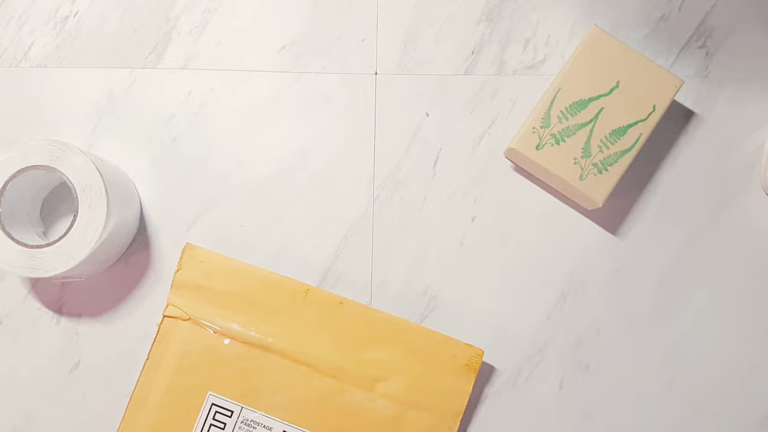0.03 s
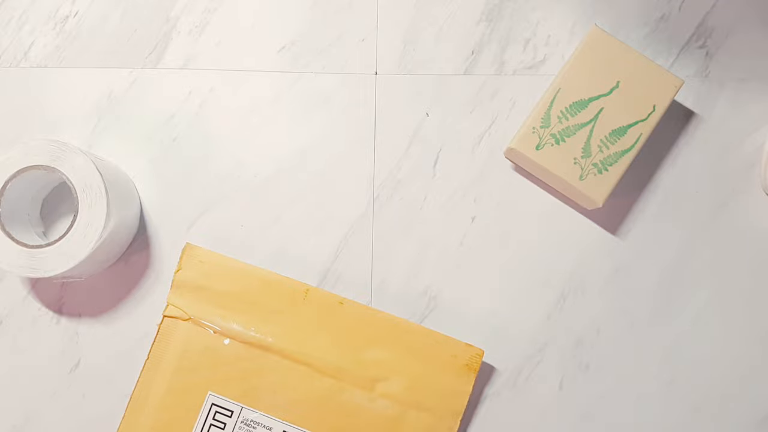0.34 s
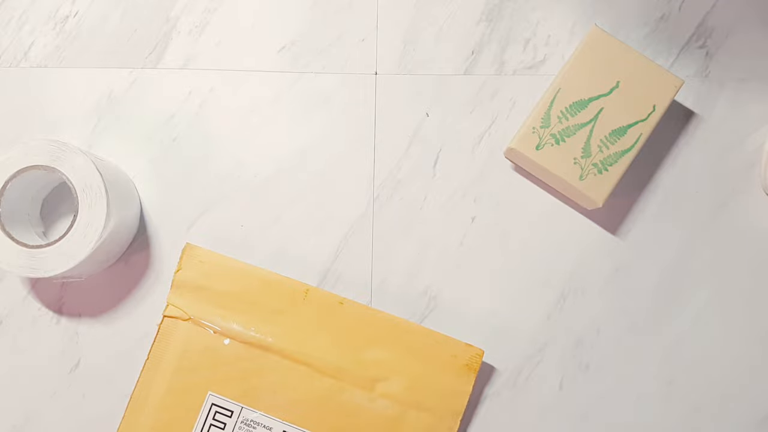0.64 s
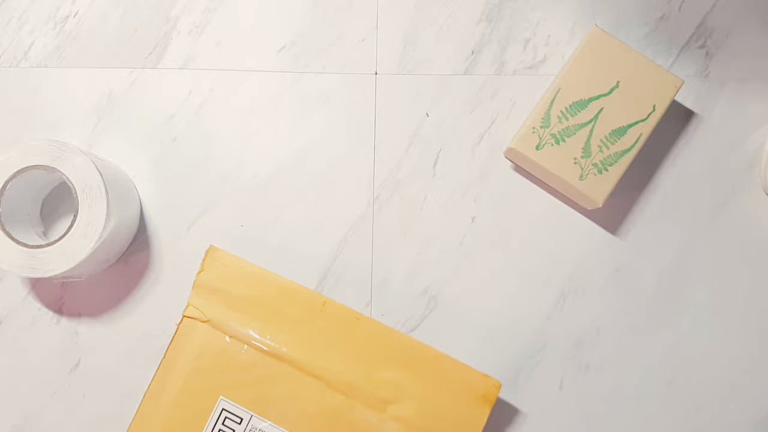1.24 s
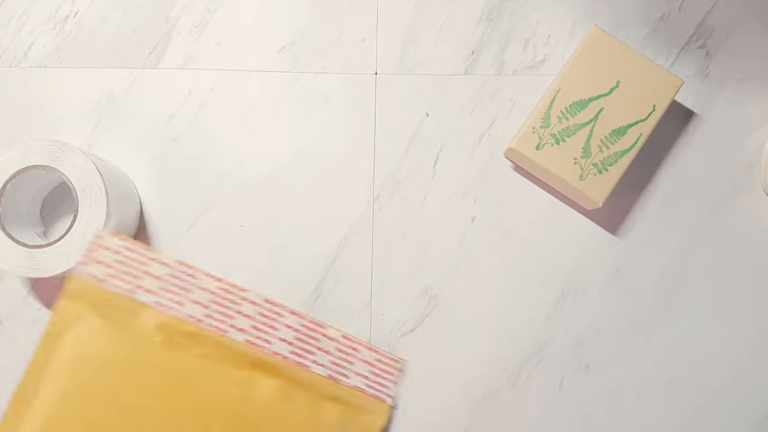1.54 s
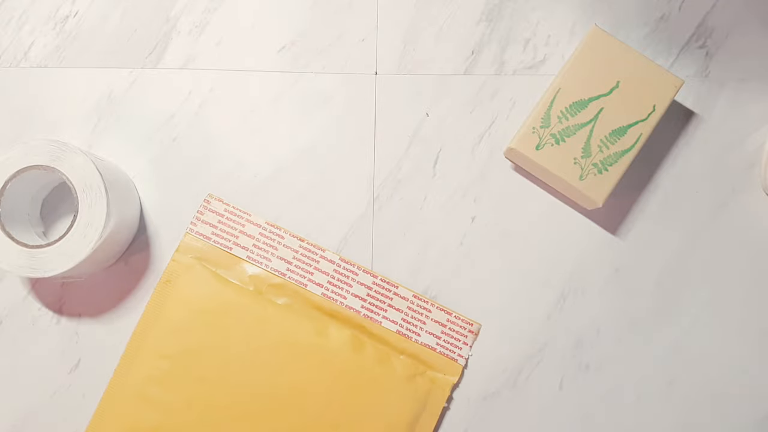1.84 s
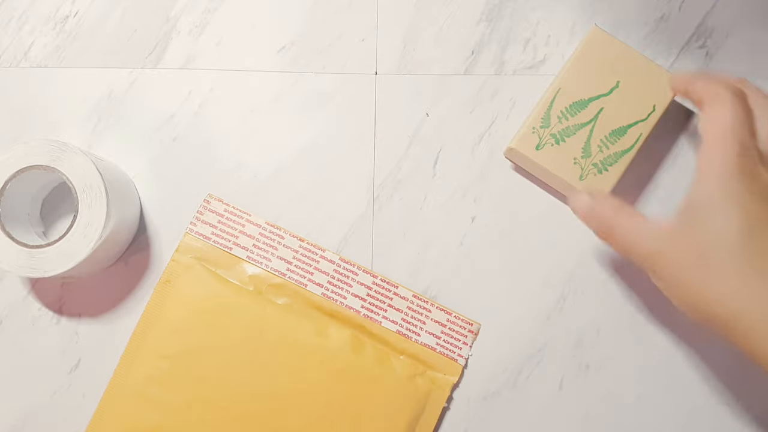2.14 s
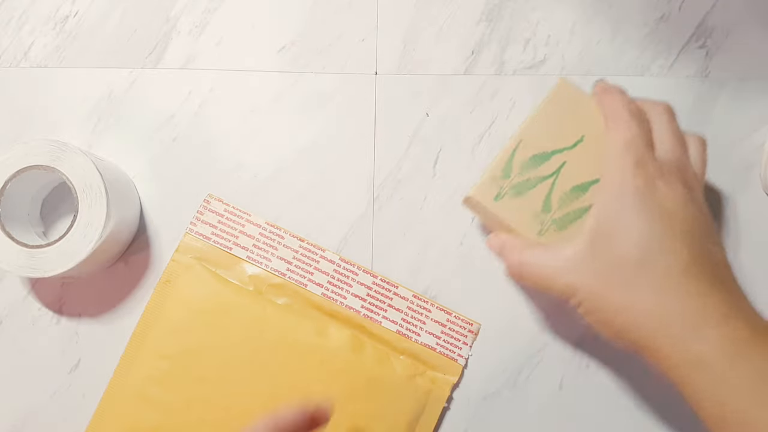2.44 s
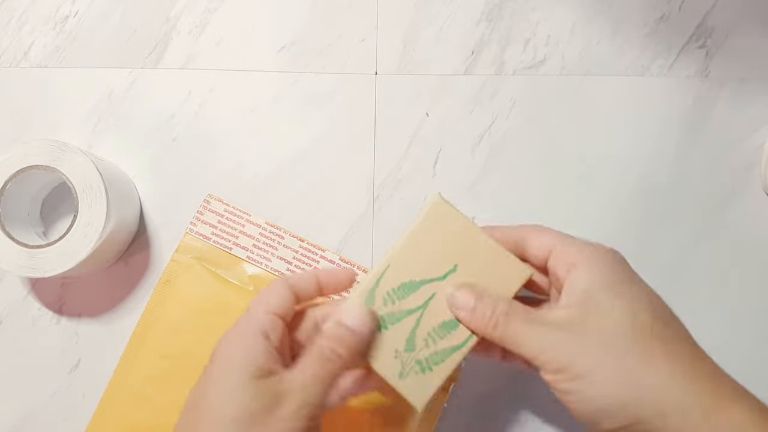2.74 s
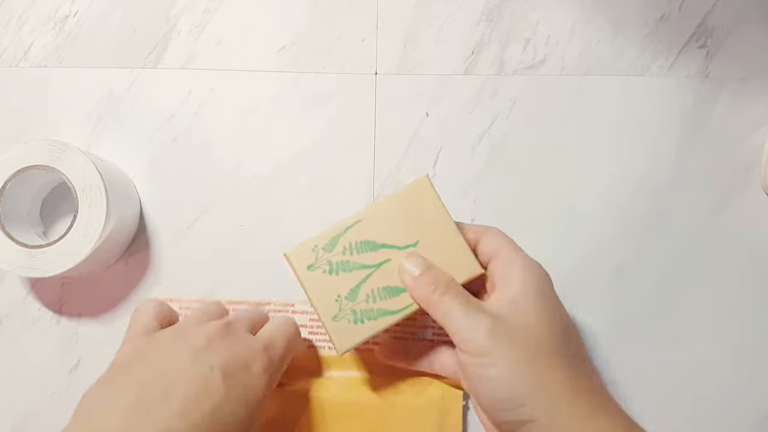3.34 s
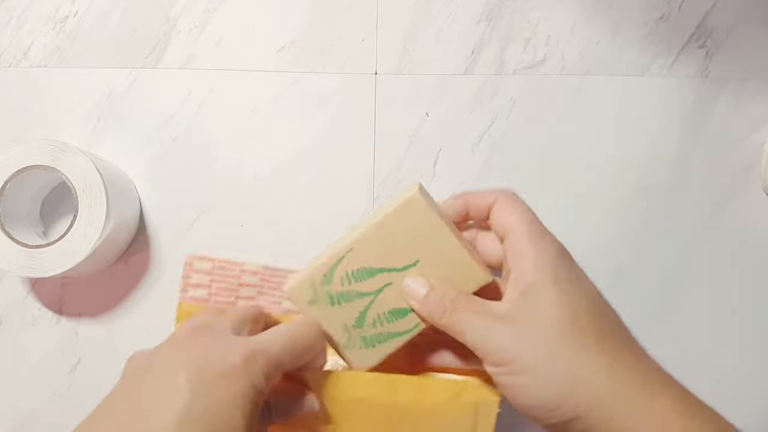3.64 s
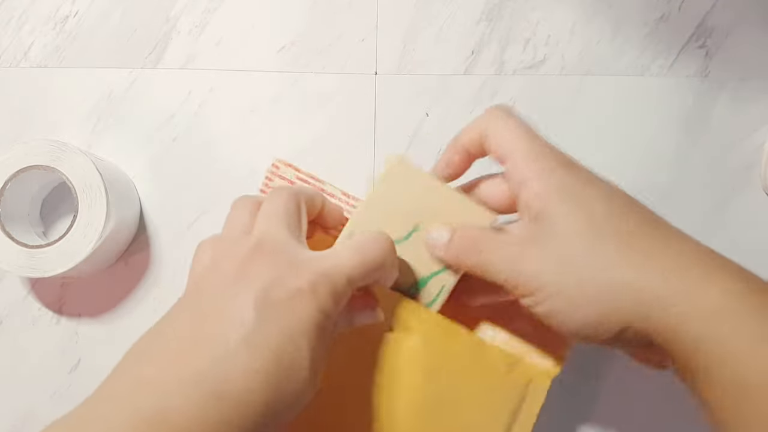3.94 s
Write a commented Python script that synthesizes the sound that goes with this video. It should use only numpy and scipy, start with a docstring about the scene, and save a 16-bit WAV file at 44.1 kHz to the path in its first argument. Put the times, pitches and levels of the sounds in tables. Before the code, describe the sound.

Close-up paper rustling in a quiet room: a padded envelope slides, turns over and lands with a soft bump. After light taps from a little cardboard box, the envelope crackles sharply as its mouth is opened.

```python
"""Paper slides and rustles as a padded mailer is turned over on a table and its mouth is worked open.
Stick-slip friction, thousands of tiny slips a second, excites the sheet and the air in the pouch.
Creases buckle with sharp snaps, the padding bumps the table, and a small cardboard box taps and scrapes.
All of it is heard close up, in stereo, over the steady low noise of a quiet room."""
import sys
import numpy as np
from scipy import signal
from scipy.fft import rfft, irfft
from scipy.io import wavfile

SR = 44100
rng = np.random.default_rng(int(sys.argv[2]) if len(sys.argv) > 2 else 0)


def digitize_waveform(pressure):
    """Quantize a signal to 16-bit integers and store it at the path in sys.argv[1].

    Rows of a 2-D input are taken as channels; values are limited to [-1, 1].
    """
    field = np.atleast_2d(pressure).T
    bounded = np.clip(field, -1, 1)
    quanta = np.round(bounded * 32767).astype(np.int16)
    wavfile.write(sys.argv[1], SR, quanta)


N = 176400

# Sliding strokes; flex, pouch and panel are relative to the paper's hiss:
# peak_s, rise_s, fall_s, level_db, tilt_db_per_octave, flex_db, pouch_db, panel_hz, panel_db
STROKES = [(.04, 0.1, 0.063, -63, 0.5, -2.5, -30, 1700, -2.5),
           (0.078, 0.013, .014, -57.5, 2.5, -10, -7, 3200, -21),
           (0.112, 0.0052, 0.02, -53, -1.5, 0.5, -37, 3050, 0),
           (0.649, 0.019, 0.011, -60.5, -3, -3, -9, 2540, 2),
           (.897, 0.023, 0.029, -58, 2, -3, -34, 2040, -3),
           (1.126, 0.035, 0.037, -66, -4.5, -1.5, -15, 2580, -3.5),
           (1.30, 0.17, 0.075, -63.5, 1.5, -14.5, -25, 3600, -24),
           (1.462, 0.036, 0.038, -50.5, 9, -7.5, -15, 1700, -10.5),
           (1.536, 0.0074, 0.023, -49.5, 6, -11.5, -21, 6100, -2),
           (1.554, 0.022, 0.017, -52, 4, -7, -14, 1790, 0.5),
           (1.62, 0.063, 0.028, -58, 4, -10.5, -26, 1820, -8),
           (1.80, 0.17, 0.21, -63.5, 3.5, -8, -19, 1010, -29),
           (2.311, 0.032, 0.07, -60, 1.5, -3, -8, 2240, -0.5),
           (2.375, 0.071, 0.046, -69.5, -11, 2.5, -5, 1870, -6),
           (2.421, 0.022, 0.013, -67, 4, 7, 4.5, 473, 12),
           (2.621, 0.0083, 0.026, -54.5, 3.5, -0.5, -6.5, 1670, -5),
           (2.796, 0.017, 0.015, -59, 6.5, -26, -18, 650, -18),
           (2.948, 0.005, 0.057, -51.5, 2.5, -12.5, -16, 3540, -23),
           (3.009, 0.017, 0.025, -45, 4.5, -12.5, -5.5, 2010, -3.5),
           (3.031, 0.0087, 0.0073, -33.5, 1, -19.5, -11.5, 5800, -13),
           (3.094, 0.025, 0.014, -49.5, 4, -8.5, -16, 3270, -3.5),
           (3.117, 0.021, 0.037, -44.5, 2, -14.5, -25, 3370, -10),
           (3.164, 0.011, 0.0088, -32, .5, -9.5, -13.5, 3900, -10),
           (3.204, 0.02, 0.024, -41.5, 2.5, -7, -26, 3420, -10),
           (3.285, 0.036, 0.18, -52, 1.5, -8.5, -16, 3300, -6.5),
           (3.373, 0.022, 0.0096, -40, -0.5, -11.5, -14, 4020, -8.5),
           (3.4, 0.01, 0.0037, -38, 2, -1.5, -34, 4200, -9),
           (3.435, 0.028, 0.024, -48, 1.5, -2.5, -19, 3000, -10),
           (3.504, 0.0044, 0.0075, -49.5, 4, -22, -15, 2800, 15.5),
           (3.522, 0.016, .014, -39, -4, -51, -7, 2640, 2.5),
           (3.60, 0.069, 0.15, -47.5, 3, -10.5, -33, 2840, -6),
           (3.686, .018, 0.038, -45, -2, -6.5, -26, 2730, -6),
           (3.769, 0.027, .025, -50, 0, -3, -17, 2700, 2.5),
           (3.798, 0.0095, 0.021, -39, -1.5, -15.5, -9.5, 2760, -3.5),
           (3.839, 0.014, 0.0094, -32.5, 5.5, -16.5, 1, 2760, -3.5),
           (3.863, 0.0054, 0.0053, -42.5, 6, -7, 3, 2770, -17),
           (3.904, 0.076, 0.064, -48, 0, -8, -9, 2680, 1),
           (3.944, .003, 0.056, -45.5, 5.5, -10, -3.5, 2550, 1.5),
           (3.999, 0.0036, .01, -28.5, 2, -27, -30, 2850, -0.5)]
# Hiss of rubbed paper: frequency_hz, level_db
PAPER_SPECTRUM = [(200, -55), (1100, -32.5), (2000, -10), (3000, 2), (4300, 0), (5500, -4.5), (6800, -6.5),
                  (8500, -10), (12000, -13), (16000, -19.5)]
# Low flexing of the sheet: frequency_hz, level_db
FLEX_SPECTRUM = [(40, -33), (100, -22), (200, 0), (350, -1.5), (600, -1), (900, -3.5), (1400, -1),
                 (4000, -37.5)]
# Air resonances of the pouch, per filter pass: pitch_hz, width_hz, gain_db
POUCH_MODES = [(1552, 160, 2), (2850, 390, -5.5)]
# Buckling creases: start_s, level_db, pitch_hz, tilt_db_per_octave
CREASE_SNAPS = [(0.106, -46.5, 2840, -9), (0.628, -57.5, 2660, -14), (0.924, -57, 2170, -10.5),
                (1.0983, -57, 2410, -8), (1.146, -57, 3100, -6), (1.558, -41, 1710, 15),
                (1.886, -41, 3140, -5.5), (3.0161, -29.5, 6770, 6), (3.094, -35.5, 3230, 3.5),
                (3.1438, -31.5, 3740, -3.5), (3.166, -26.5, 4530, -1), (3.3971, -25.5, 3740, -5),
                (3.4, -28.5, 4100, -5.5), (3.416, -36, 4270, -9.5), (3.44, -35.5, 3000, 2),
                (3.4788, -40.5, 3300, -2.5), (3.5012, -34.5, 2810, -5.5), (3.523, -28.5, 2940, -6),
                (3.576, -48, 3500, 4), (3.68, -36, 3000, 4.5), (3.721, -46, 3000, -2),
                (3.758, -43.5, 1960, -1), (3.819, -27.5, 2820, 11), (3.8408, -27, 2940, 0.5),
                (3.8564, -29.5, 5100, 0.5), (3.8599, -29, 2700, 10), (3.9413, -41, 2630, -1),
                (3.9718, -33.5, 2920, -7.5)]
# Crack of a crease: frequency_hz, level_db
CREASE_SPECTRUM = [(200, -35.5), (1100, -15.5), (2000, -8), (3000, -0.5), (4300, 1), (5500, -3.5),
                   (7000, -4.5), (9000, -6), (16000, -18)]
# Impacts on the table: start_s, level_db, tilt_db_per_octave, pitch_ratio, ring_db
MAILER_BUMPS = [(.108, -57, 3, 1.4, 5), (0.129, -59, -1, 1.56, 1), (.142, -55, -6, 1.45, 6),
                (1.21, -56, -8, 1.23, -3), (1.381, -64.5, -2, 1.2, 5), (1.512, -52, 1.5, 1.3, 0),
                (1.8871, -42.5, 1.5, 1.03, -3.5), (1.8923, -39.5, 0, 1.03, 6.5), (1.914, -66, 6, 0.8, -9),
                (2.616, -56, -2.5, 1.57, -3), (3.088, -57, 13, 1.3, -4), (3.107, -51, -5, 1.34, -1.5),
                (3.167, -33.5, 1, 1.18, -4), (3.176, -43, -9, .55, 1), (3.204, -43.5, 11.5, 1.16, -3),
                (3.3998, -34.5, -1, 2.2, -12), (3.417, -29, 3, 1.62, 2), (3.4202, -39, 2, 1.94, 3),
                (3.433, -40.5, 0, 2.5, 0.5), (3.54, -48, -7, 0.78, 1), (3.578, -50.5, 2, 1.3, -11),
                (3.6811, -39, 5, 1.13, 6), (3.703, -42, -1.5, 1.07, -5), (3.72, -45, 8, 0.49, -1.5),
                (3.86, -51.5, -1, 1.2, -10)]
# Slap of the padding: frequency_hz, level_db
PADDING_SPECTRUM = [(25, -55), (55, -32), (100, -8.5), (220, 12.5), (400, 1), (800, -0.5), (1300, -19.5),
                    (3000, -39), (12000, -58)]
# Modes of the mailer on the table, before each bump's ratio and tilt: pitch_hz, level_db, t60_s
MAILER_MODES = [(125, -11, 0.076), (215, 1.5, 0.059), (397, -1, 0.04), (515, -17, .05), (820, -32, 0.044)]
# Side of a bump (positive right, negative left; half the magnitude is lost in level): time_s, side_db
BUMP_SIDES = [(1.9, .3), (3.4, -1), (3.416, -7), (3.44, -7), (3.54, -.5)]
# Taps and scrapes of the small cardboard box, which rings near 500 Hz as it catches on the table:
# start_s, level_db, pitch_hz, tilt_db_per_octave, ring_db
BOX_CONTACTS = [(1.835, -57.5, 1060, -0.5, -1), (2.278, -62, 610, -14, 2), (2.301, -54, 1110, -1, 3),
                (2.333, -58.5, 600, -5, -2), (2.376, -58.5, 690, 1, -1), (2.436, -53, 496, -2.5, 6.5),
                (2.618, -62, 613, 7, -12), (2.647, -57.5, 596, 5, 10), (2.7038, -59.5, 543, -4, 0),
                (2.711, -63, 650, -6, -1), (2.7235, -55.5, 594, -4, 5), (2.7408, -50.5, 774, -1, 5),
                (2.76, -43.5, 760, 0, -9), (2.766, -53.5, 615, 0, 7), (2.781, -58.5, 580, -5, 16)]
# Struck cardboard: frequency_hz, level_db
CARD_SPECTRUM = [(40, -55), (150, -4.5), (300, -0.5), (700, -3), (1600, -1.5), (2500, -13), (5000, -11.5),
                 (14000, -45)]
# Early reflections: frequency_hz, level_db
REFLECTION_SPECTRUM = [(100, -16), (400, -10), (1500, 0), (15000, 0)]
# Room noise and microphone hiss: frequency_hz, level_db
BACKGROUND_SPECTRUM = [(20, 2), (40, -13), (64, -10.5), (110, 8), (190, 1), (305, 4), (400, 0), (700, -1.5),
                       (2300, -8.5), (4500, -9), (7000, -12), (15500, -16.5)]

SLIPS_PER_S, SLIP_SCATTER_DB, MAX_SLIP_DB = 4500, 3.5, 11
SNAP_WINDOW_S, KNOCK_WINDOW_S = 0.002, 0.008  # a contact's level is its energy averaged over this time
PAPER_PAN_DB = 2.5


def paper_friction(size=32768, smooth_gain=0.42, stroke_exponent=1.37, trim_db=-1):
    """Stick-slip friction: uneven slips drive the paper, its free panel, low flexing and the pouch air."""
    out, t = np.zeros((2, N)), (np.arange(size) - size // 2) / SR
    for peak_s, rise_s, fall_s, level_db, tilt, flex_db, pouch_db, panel_hz, panel_db in STROKES:
        slipping = rng.random(size) < SLIPS_PER_S / SR
        slip_db = np.minimum(SLIP_SCATTER_DB * rng.exponential(size=size), MAX_SLIP_DB)
        slips = slipping * undb(slip_db) * rng.choice([-1, 1], (2, size))
        friction = stereo(unit(slips) + smooth_gain * rng.standard_normal((2, size)))
        hiss = colour(friction, PAPER_SPECTRUM, tilt)
        pouch = resonate(resonate(friction, POUCH_MODES), POUCH_MODES)
        panel = resonate(friction, [(panel_hz, 0.23 * panel_hz, 0)])
        panel = resonate(panel, [(panel_hz, panel_hz, 0)])  # a broad second pass steepens the skirts
        paper = unit(hiss) + undb(pouch_db) * unit(pouch) + undb(panel_db) * unit(panel)
        flex = undb(flex_db) * unit(colour(friction, FLEX_SPECTRUM))
        envelope = np.exp(-np.abs(t / np.where(t < 0, rise_s, fall_s)) ** stroke_exponent)
        add(out, peak_s + t[0], undb(level_db + trim_db) * envelope * (paper * pan(PAPER_PAN_DB) + flex))
    return out


def crease_snaps(ring_decay_s=0.0011, ring_db=-4.5):
    """Buckling: a crease gives way with a crack, and its facet vibrates for a few cycles."""
    out = np.zeros((2, N))
    for start_s, level_db, pitch_hz, tilt in CREASE_SNAPS:
        t, force = burst(decay_s=0.003)
        facet = np.sin(2 * np.pi * pitch_hz * t) * np.exp(-t / ring_decay_s)
        snap = unit(colour(force, CREASE_SPECTRUM, tilt)) + undb(ring_db) * unit(facet)
        add(out, start_s, undb(level_db) * unit(snap, SNAP_WINDOW_S * SR) * pan(PAPER_PAN_DB))
    return out


def mailer_bumps():
    """Cushioned impact: a dull slap and low damped modes, each bump sounding in one channel only."""
    out = np.zeros((2, N))
    for start_s, level_db, tilt, pitch_ratio, ring_db in MAILER_BUMPS:
        t, force = burst(decay_s=0.002)
        ring = 0
        for hz, mode_db, t60_s in MAILER_MODES:
            gain = undb(mode_db + tilt * np.log2(hz / 200))
            ring += gain * np.sin(2 * np.pi * hz * pitch_ratio * t) * decay(t, t60_s)
        thud = unit(colour(force, PADDING_SPECTRUM, tilt)) + undb(ring_db) * unit(ring)
        side_db = np.interp(start_s, *np.transpose(BUMP_SIDES))
        silent_channel = 0 if side_db > 0 else 1
        thud[silent_channel] = 0
        add(out, start_s, undb(level_db - abs(side_db) / 2) * unit(thud, KNOCK_WINDOW_S * SR))
    return out


def box_contacts(decay_s=0.0024):
    """Damped plate vibration: at each tap or scrape the stiff card's ring swells and quickly dies."""
    out = np.zeros((2, N))
    for start_s, level_db, pitch_hz, tilt, ring_db in BOX_CONTACTS:
        t, force = burst(decay_s)
        swell = 1 - np.exp(-2 * pitch_hz * t)
        ring = np.sin(2 * np.pi * pitch_hz * t) * np.exp(-t / decay_s) * swell
        contact = unit(colour(force, CARD_SPECTRUM, tilt)) + undb(ring_db) * unit(ring)
        add(out, start_s, undb(level_db) * unit(contact, KNOCK_WINDOW_S * SR))
    return out


def room(direct, size=16384, early_db=-11, early_decay_s=0.008, tail_db=-19):
    """Reverberation: quick reflections from the table top, then a faint diffuse tail."""
    t = np.arange(size) / SR
    early = rng.standard_normal((2, size)) * np.exp(-t / early_decay_s) * (t > 0.001)
    early = colour(early, REFLECTION_SPECTRUM)
    tail = rng.standard_normal((2, size)) * decay(t, t60_s=0.16) * (t > 0.008)
    tail = colour(tail, [(100, -12), (600, -2), (4000, 0), (15000, -5)])
    response = undb(early_db) * unit(early, 0.95) + undb(tail_db) * unit(tail, 1)
    return direct + signal.fftconvolve(direct, response, axes=1)[:, :N]


def room_tone(level_db=-67.5):
    """Stationary noise: the low sound of the room and microphone hiss."""
    return undb(level_db) * unit(colour(stereo(rng.standard_normal((2, N))), BACKGROUND_SPECTRUM))


def burst(decay_s, size=4096):
    """Impulsive excitation: a time axis and the fast-dying noise of a contact."""
    t = np.arange(size) / SR
    return t, stereo(rng.standard_normal((2, size)) * np.exp(-t / decay_s)) * (t < t[-1] / 2)


def decay(t, t60_s):
    """Exponential damping: a fall of 60 dB in t60_s."""
    return np.exp(-np.log(1000) * t / t60_s)


def colour(x, spectrum, tilt=0):
    """Minimum-phase filtering through (frequency_hz, level_db) points, tilted in dB per octave."""
    hz, db = np.transpose(spectrum)
    f, n = freqs(x), x.shape[-1]
    gain_db = np.interp(np.log2(f), np.log2(hz), db) + tilt * np.log2(np.maximum(f, 200) / 1000)
    cepstrum = irfft(np.log(undb(gain_db)), n)
    cepstrum[1:n // 2] *= 2  # folding onto positive time makes the filter causal
    cepstrum[n // 2 + 1:] = 0
    return irfft(rfft(x) * np.exp(rfft(cepstrum)), n)


def resonate(x, modes):
    """Forced resonance: parallel band-pass modes given as (pitch_hz, width_hz, gain_db)."""
    f = freqs(x)
    response = sum(undb(db) / (1 + 1j * (f * f - hz * hz) / (f * width)) for hz, width, db in modes)
    return irfft(rfft(x) * response, x.shape[-1])


def stereo(x, spread_hz=3000):
    """Partial coherence: two unrelated signals become left and right, alike in bass, apart in treble."""
    f = freqs(x)
    side = irfft(rfft(x[1]) * f / np.hypot(f, spread_hz), x.shape[-1])
    return np.array([x[0] + side, x[0] - side])


def pan(db):
    """Level difference: channel gains with the left db above the right."""
    return undb(np.array([[db], [-db]]) / 2)


def add(out, start_s, x):
    """Superposition: mix a sound in at start_s."""
    offset = int(round(start_s * SR))
    first, last = max(offset, 0), min(offset + x.shape[-1], N)
    out[:, first:last] += x[:, first - offset:last - offset]


def undb(db):
    """Amplitude ratio of a level in decibels."""
    return 10 ** (np.asarray(db) / 20)


def unit(x, count=None):
    """Normalisation to rms 1, the energy spread over count samples (default: all)."""
    return x / np.sqrt(np.mean(np.sum(x ** 2, -1)) / (count or x.shape[-1]) + 1e-24)


def freqs(x):
    """Fourier frequencies of a sound, floored at 1 Hz."""
    return np.maximum(np.fft.rfftfreq(x.shape[-1], 1 / SR), 1)


def scene(low_cut_hz=67):
    """Radiation: the light paper and card give off no deep bass and sound over the room's quiet floor."""
    handling = paper_friction() + crease_snaps() + mailer_bumps() + box_contacts()
    low_cut = signal.butter(3, low_cut_hz, "high", fs=SR, output="sos")
    return room(signal.sosfilt(low_cut, handling)) + room_tone()


def record(dry, top_hz=15950):
    """Band limiting: a steep low-pass removes the highest treble."""
    return signal.sosfilt(signal.ellip(12, 0.1, 70, top_hz, fs=SR, output="sos"), dry)


dry = scene()
out = record(dry)
digitize_waveform(out)
```